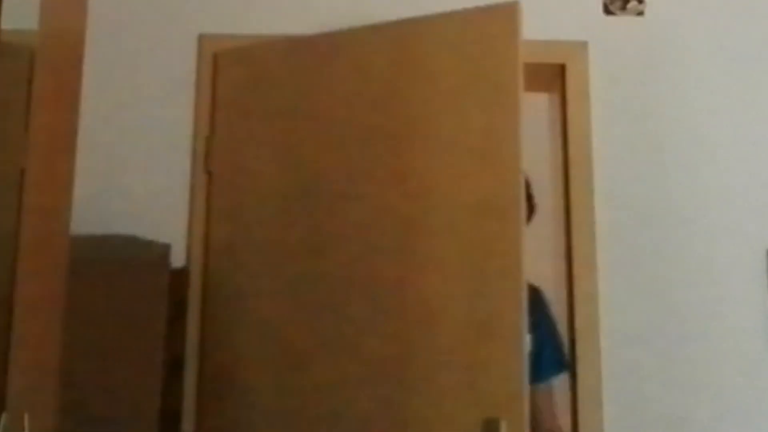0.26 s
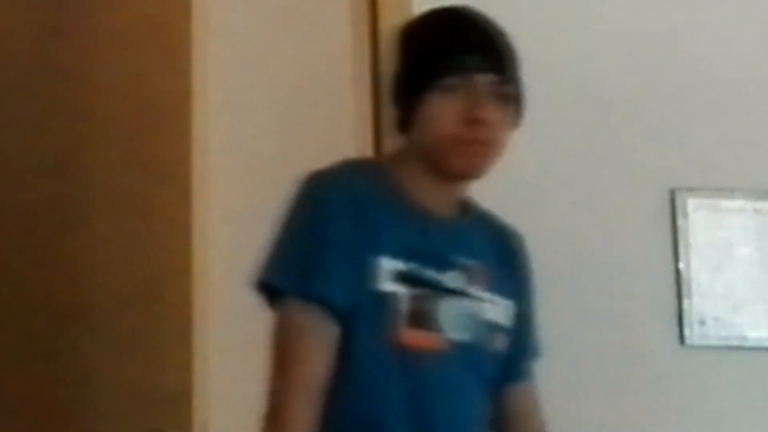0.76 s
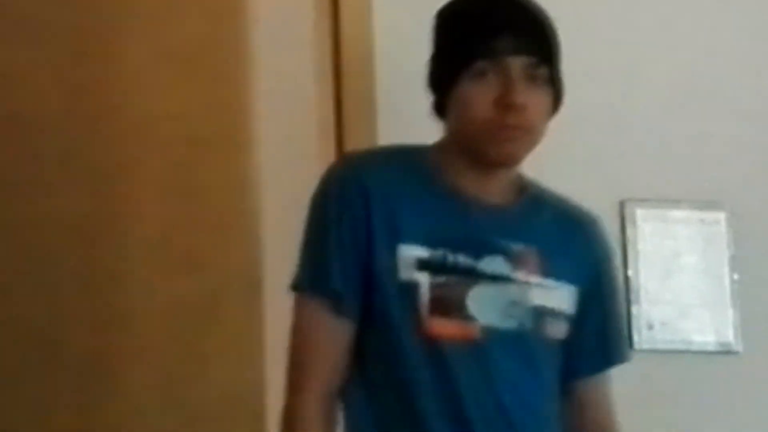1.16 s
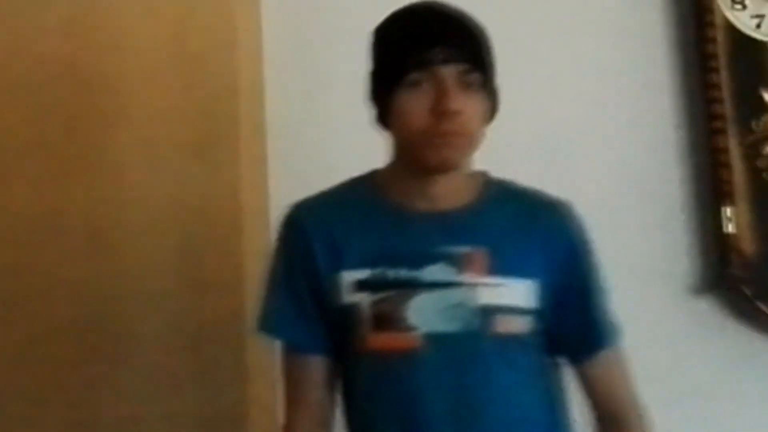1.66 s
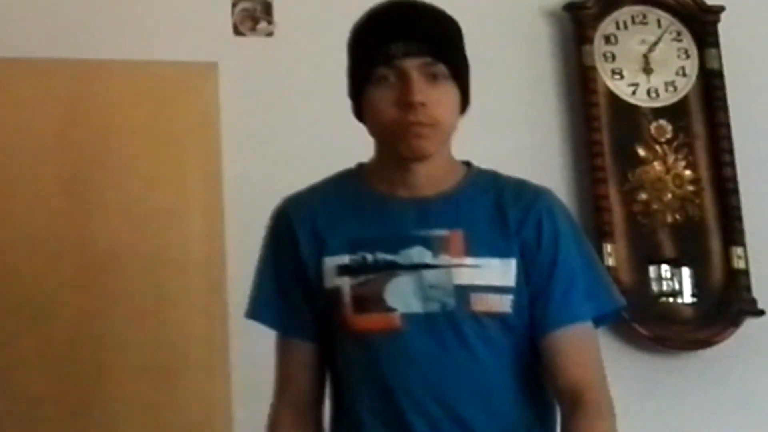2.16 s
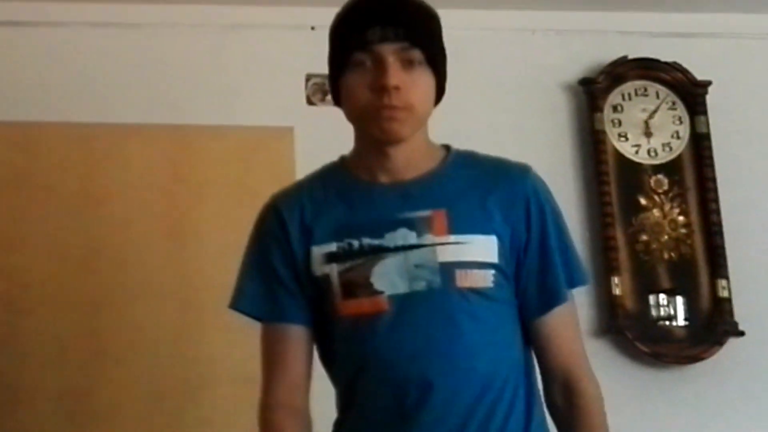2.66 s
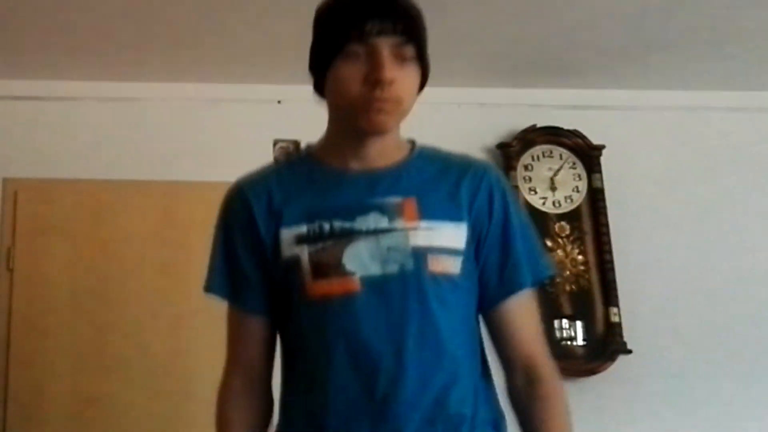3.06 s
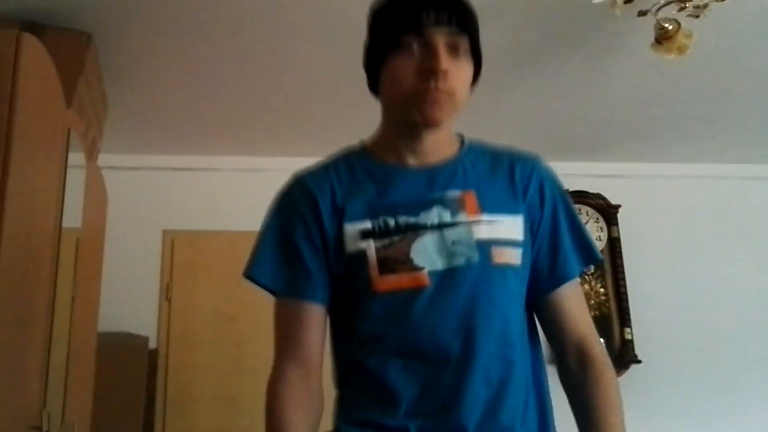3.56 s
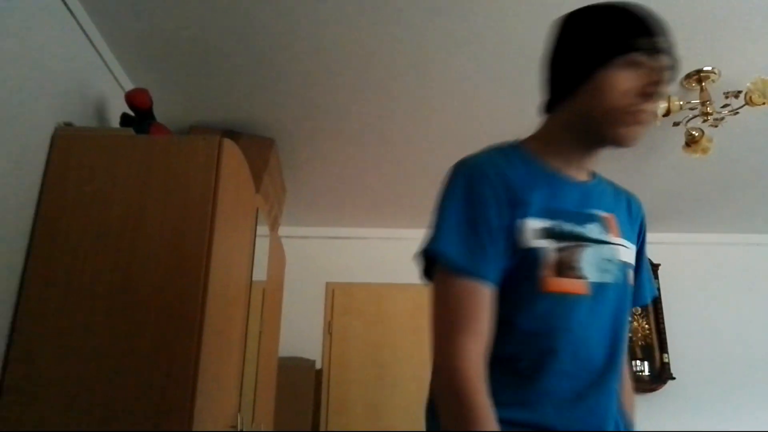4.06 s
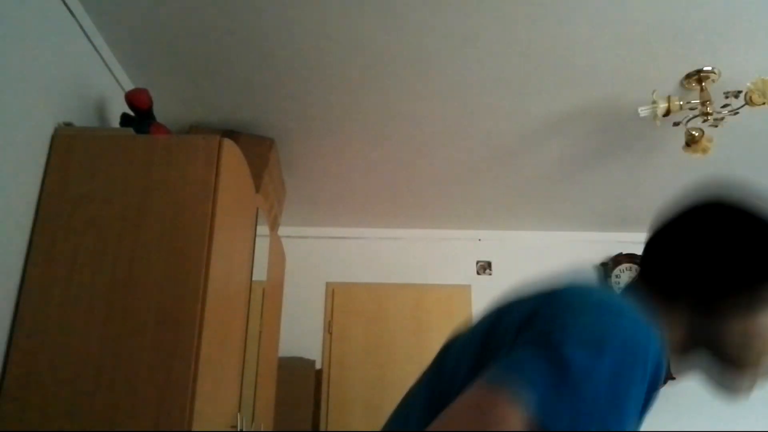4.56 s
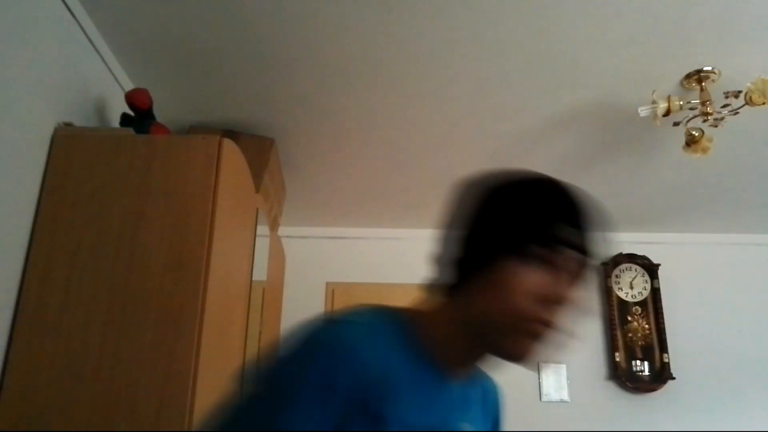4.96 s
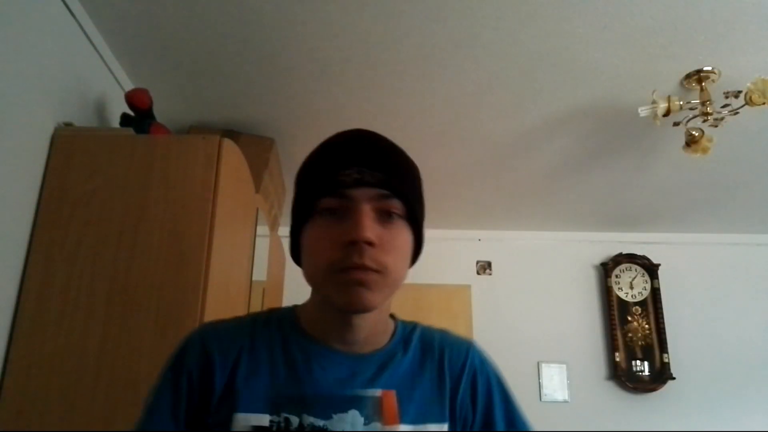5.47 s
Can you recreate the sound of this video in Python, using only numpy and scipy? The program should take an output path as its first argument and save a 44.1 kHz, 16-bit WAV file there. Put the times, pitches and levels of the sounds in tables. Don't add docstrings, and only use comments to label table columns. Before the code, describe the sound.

In a hissy small room a door bangs shut at two seconds, its frame shaking; steps, knocks and a faint clock tick surround it.

```python
import sys
import numpy as np
from scipy import signal
from scipy.fft import rfft, irfft
from scipy.io import wavfile
from scipy.ndimage import uniform_filter1d

SR = 44100
rng = np.random.default_rng(int(sys.argv[2]) if len(sys.argv) > 2 else 0)


def wrap_up_sound(samples):
    columns = np.atleast_2d(samples).T
    tamed = np.clip(columns, -1, 1)
    steps = np.round(tamed * 32767).astype(np.int16)
    wavfile.write(sys.argv[1], SR, steps)


def ratio(d):
    e = np.asarray(d, float) / 20
    return 10 ** e


N = 252526


def evened(x):
    return x / np.sqrt(np.mean(x ** 2) + 1e-20)


def steady(x):
    return evened(x / np.sqrt(uniform_filter1d(x ** 2, size=3000) + 1e-12))


def read(points, hz):
    f, value = np.transpose(points)
    return np.interp(np.log(hz + 1), np.log(f + 1), value)


def add(mix, s, sound):
    part = mix[..., round(s * SR):][..., :sound.shape[-1]]
    part += sound[..., :part.shape[-1]]


def band(x, lo_hz, hi_hz):
    return signal.sosfilt(signal.butter(2, [lo_hz, hi_hz], "band", fs=SR, output="sos"), x)


def colour(x, db_points):
    hz = np.fft.rfftfreq(x.shape[-1], 1 / SR)
    return irfft(rfft(x) * ratio(read(db_points, hz)), x.shape[-1])


def ring(modes, seconds):
    t = np.arange(round(seconds * SR)) / SR
    return sum(ratio(db - 60 * t / t60) * np.sin(2 * np.pi * hz * t) for hz, db, t60 in modes)


def contact(length, rise=0.0009, grit_db=11.5):
    t = np.arange(round(.25 * SR)) / SR
    grit = evened(uniform_filter1d(rng.standard_normal(len(t)), size=60))
    return (1 - np.exp(-t / rise)) * np.exp(-t / max(length, .002)) * ratio(grit_db * grit)


def swells(s, db, rise_db_s, fall_db_s, rest_db):
    coarse = np.arange(0, N + 64, 64)
    t = coarse[:, None] / SR - s
    level = ratio(db + np.where(t < 0, rise_db_s * t, -fall_db_s * t))
    power = (level ** 2).sum(1) + ratio(rest_db) ** 2
    return np.interp(np.arange(N), coarse, np.sqrt(power))


def pair(a, b, same, lean):
    hz = np.fft.rfftfreq(len(a), 1 / SR)
    likeness = np.clip(read(same, hz), -1, 1)
    tilt = ratio(read(lean, hz) / 2)
    left, other = rfft(a), rfft(b)
    right = likeness * left + np.sqrt(1 - likeness ** 2) * other
    return irfft(np.array([left * tilt, right / tilt]), len(a))


def both_ports(x, left_db):
    return x * ratio(np.array([[left_db], [-left_db]]))


def hiss():
    # (frequency [Hz], level [dB per Hz])
    spectrum = [(35, -46), (60, -9.5), (295, -7), (399, -8), (480, -10.5), (526, -5.5), (798, -9),
                (937, -6), (1030, -7.5), (1420, -16), (3260, -18.5), (13700, -26), (15000, -22)]
    # (frequency [Hz], likeness [-1..1])
    port_same = [(60, -0.015), (180, 0.87), (540, 0.46), (1620, -0.22), (4850, -0.12), (14500, 0.092)]
    # (frequency [Hz], left over right [dB])
    port_lean = [(60, 0.67), (240, 2.2), (930, 3), (3690, 1.3), (14500, 0.28)]
    a, b = (colour(rng.standard_normal(N), spectrum) for _ in range(2))
    drift = evened(uniform_filter1d(rng.standard_normal(N), size=5000))
    return ratio(-64.5 + .5 * drift) * evened(pair(a, b, port_same, port_lean))


def ping(db, hz, rise, t60):
    sound = ring([(hz, 0, t60), (hz * 1.07, -5, t60 * .8)], .3)
    rough = 1 + 0.66 * evened(uniform_filter1d(rng.standard_normal(len(sound)), size=200))
    t = np.arange(len(sound)) / SR
    return ratio(db) * sound * rough * (1 - np.exp(-t / max(rise, .0005)))


def pings():
    # (time [s], level [dB], pitch [Hz], rise [s], t60 [s])
    hollow_parts = [(.005, -60.5, 293, 0.011, 0.24), (0.3527, -47, 1076, 0.001, 0.027),
                    (.829, -51.5, 929, 0.002, 0.077), (2.106, -30.5, 1202, 0.002, 0.054),
                    (2.112, -32, 911, 0.0034, 0.13), (2.134, -34, 595, 0.0033, 0.094),
                    (2.16, -28, 373, 0.0035, 0.079), (2.384, -47, 529, .015, 0.17),
                    (3.813, -32, 317, 0.0019, 0.052), (4.38, -34, 510, 0.0013, 0.042),
                    (4.655, -45, 686, 0.003, 0.068), (4.95, -67, 1990, .01, 0.08),
                    (5.0665, -46.5, 1055, 0.0025, 0.042), (5.32, -70, 2200, 0.018, 0.47),
                    (8.1, -67, 1900, 0.007, 0.25)]
    out = np.zeros(N)
    for s, *row in hollow_parts:
        add(out, s, ping(*row))
    return out


def footfall_boom():
    # (time [s], boom near 40 Hz [dB], hum [dB])
    landings = [(.02, -65, -56.5), (.1, -80, -60), (0.501, -55, -43.5), (.57, -53, -49), (.92, -66, -64),
                (1.09, -65.5, -88), (1.25, -80, -70), (1.71, -55.5, -59.5), (2.11, -48, -71),
                (2.42, -47, -47), (2.53, -44, -55), (2.69, -52.5, -61), (2.88, -54, -76), (3.2, -62, -79),
                (3.42, -64, -68), (3.53, -71.5, -60), (3.86, -53, -52), (3.92, -60, -57),
                (4.16, -64, -64.5), (4.39, -50, -54), (4.47, -56, -55), (4.62, -53, -48.5),
                (4.79, -54.5, -63), (5.06, -67, -70), (5.181, -58, -61.5), (5.37, -85, -63.5),
                (5.42, -73, -56), (5.47, -63, -59.5), (5.7, -78, -64)]
    s, boom_db, hum_db = np.transpose(landings)
    noise = rng.standard_normal((2, N))
    boom = steady(band(noise[0], 32.0, 52.2))
    boom = boom * swells(s, boom_db, rise_db_s=252, fall_db_s=94, rest_db=-75)
    wander = 0.82 * evened(uniform_filter1d(uniform_filter1d(noise[1], size=900), size=900))
    hum_hz = 129.5
    hum = np.sqrt(2) * np.sin(2 * np.pi * hum_hz * np.arange(N) / SR + wander)
    hum = hum * swells(s, hum_db, rise_db_s=520, fall_db_s=142, rest_db=-79)
    return both_ports(boom + hum, .8)


def knock(db, hz, thud_db, crack_db, length, touch, bright_db=0.0):
    noise = rng.standard_normal((3, round(.25 * SR)))
    drive = 0.12 * noise[0] * contact(length, rise=length * 0.28, grit_db=3.0)
    drive[60] += touch
    modes = [(hz, 0, 11 / hz), (hz * 1.043, -5, 9 / hz), (hz * 2.01, -12, 9 / hz),
             (hz * 3.2, -17, 11 / hz), (hz * 1.4, -6, 7 / hz)]
    body = signal.fftconvolve(drive, ring(modes, .1))[:len(drive)]
    thud = evened(band(noise[1], 94, 300)) * contact(length * 3.08, 0.013, 1)
    grain = band(noise[2], 780, 3280)
    grain = grain + ratio(bright_db) * 0.16 * band(noise[2], 3420, 5670)
    grain = grain + 0.067 * band(noise[2], 7900, 14000)
    crack = evened(grain) * contact(length * 1.75, rise=length * 0.15 / touch, grit_db=2.5)
    blow = ratio(db - 2.5) * body / abs(body).max()
    return blow + ratio(db - 6.0) * (ratio(thud_db) * thud + ratio(crack_db) * crack)


def steps():
    # (time [s], blow [dB], body pitch [Hz], crack re blow [dB])
    step_blows = [(0.25, -58.5, 940, -17), (0.369, -48, 420, -6), (0.479, -41, 257, -8),
                  (0.496, -39, 225, -21), (0.9, -59, 496, -17), (1.228, -53, 1090, -1.5),
                  (1.25, -59, 1120, -29), (1.688, -51.5, 830, 0), (2.699, -46.5, 620, -11),
                  (2.864, -50, 935, -8), (3.527, -47.5, 935, -4), (4.34, -53, 190, -4),
                  (4.419, -36.5, 300, -6.5), (4.449, -54.5, 543, -0.5), (4.515, -46, 278, 0),
                  (4.596, -41.5, 257, -27), (4.752, -47, 334, -23), (4.817, -46, 290, -19),
                  (5.048, -46, 520, -30), (5.474, -43, 980, -19), (5.497, -43, 940, -24)]
    out = np.zeros(N)
    for s, db, hz, crack_db in step_blows:
        add(out, s, knock(db, hz, -4.5, crack_db, length=.011, touch=0.72))
    return out


def rubs():
    # (peak time [s], rub [dB], swell [s], fade [s], top re rub [dB])
    slides = [(.252, -57.5, 0.028, 0.085, -0.5), (.354, -62.5, 0.086, 0.16, -21),
              (.924, -65, 0.066, 0.13, 6.5), (.998, -60.5, 0.34, .09, -17), (1.232, -63.5, 0.11, 0.062, -8),
              (1.598, -56.5, 0.053, 0.063, -13), (1.742, -60.5, 0.27, 0.13, -7.5),
              (2.706, -54.5, .02, 0.24, -18), (2.962, -64, 0.084, 0.1, -5), (3.328, -64, .04, 0.45, -16),
              (3.534, -59.5, .06, 0.089, -16), (3.931, -60.5, 0.079, 0.32, -10),
              (4.155, -72, 0.021, 0.054, 1), (4.47, -56, 0.13, 0.052, -7), (4.658, -58, 0.15, 0.12, -7),
              (4.954, -63, 0.88, 0.49, -5.5), (5.502, -60.5, 0.17, 0.23, -7.5),
              (5.68, -64.5, 0.28, .2, -6.5)]
    s, rub_db, swell, fade, top_db = np.transpose(slides)
    span_db = 18.5
    rates = span_db / np.maximum(swell, .005), span_db / np.maximum(fade, .005)
    grit = rng.standard_normal((N, 2)).T * ratio(2.36 * np.minimum(rng.exponential(1, N), 5))
    low, top = evened(band(grit[0], 590, 5630)), evened(band(grit[1], 4300, 21800))
    low = low * swells(s, rub_db, *rates, rest_db=-86)
    top = top * swells(s, rub_db + top_db, *rates, rest_db=-82.5)
    return ratio(-4.5) * (low + top)


def knocks():
    # (time [s], blow [dB], body pitch [Hz], crack re blow [dB], brightness [dB])
    light_blows = [(0.344, -59, 242, 3, 0), (0.351, -39.5, 1090, -7, -8), (0.825, -48.5, 790, -7, -9),
                   (0.838, -51, 1010, -21, -9), (3.379, -45.5, 345, -21, 0), (3.796, -36.5, 290, -7.5, -6),
                   (3.805, -28, 285, -4, -6), (3.815, -31, 385, -8.5, 6), (3.821, -33, 267, -26, -5),
                   (3.858, -37.5, 353, -8, 8), (4.374, -29.5, 576, -6.5, -3), (4.382, -32, 520, -3, 48),
                   (4.386, -35.5, 486, -18, 2), (4.63, -40, 266, -18, 18), (4.655, -37.5, 297, -26, 0),
                   (4.688, -40.5, 281, -31, 4), (5.076, -47, 890, -32, -5), (5.112, -43, 800, -29, -5),
                   (5.162, -49, 242, -15.5, 13.5), (5.52, -44.5, 980, -12, 0), (5.558, -41.5, 360, -26, 0),
                   (5.6, -50, 333, -28, 0), (5.69, -51, 420.4, -20, 0)]
    out = np.zeros(N)
    for s, db, hz, crack_db, bright_db in light_blows:
        add(out, s, knock(db, hz, -19, crack_db, length=0.011, touch=0.97, bright_db=bright_db))
    return out


def clock():
    # (time [s], level [dB])
    ticks = [(1.041, -48), (1.571, -46), (2.632, -46), (3.163, -47), (3.694, -46), (4.225, -47),
             (4.757, -47), (5.287, -46)]
    # (frequency [Hz], level [dB], t60 [s])
    case_modes = [(900, -3, .003), (1500, -3, .003), (1950, -6, .004), (4200, -12, .004), (6800, -17, .003)]
    out = np.zeros((2, N))
    for s, db in ticks:
        add(out, s, both_ports(-ratio(db) * ring(case_modes, .006), 1.5))
    return out


def puff():
    # (time [s], level [dB], length [s])
    air_push = (2.038, -39, .05)
    s, db, length = air_push
    out = np.zeros(N)
    add(out, s, ratio(db) * np.hanning(round(length * SR)))
    return both_ports(out, .8)


def latch():
    # (time [s], level [dB], contact length [s])
    scrapes = [
        (2.104, -27.5, 0.01),
        (2.109, -27.5, 0.0072),
        (2.133, -24.5, 0.017),
        (2.172, -41, 0.011),
        (2.208, -48, 0.059),
        (2.385, -65.5, 0.081),
    ]
    # (time [s], level [dB])
    snaps = [
        (2.109, -21),
        (2.119, -39),
        (2.139, -43),
    ]
    # (frequency [Hz], level [dB], t60 [s])
    metal_modes = [(3612, 0, .025), (4312, -10, .02), (4802, -6, .03), (5712, -8, .03), (6230, -9, .03),
                   (7887, -8, .02)]
    # (frequency [Hz], level [dB per Hz])
    rattle = [(120, -27), (250, 2.5), (600, -4), (1100, -5), (2400, -7), (3300, -7.5), (5500, -5.5),
              (8000, -12.5), (10300, -22.5), (13700, -18), (15000, -59)]
    drive, metal = np.zeros(N), np.zeros(N)
    for s, db, length in scrapes:
        add(drive, s, ratio(db) * contact(length, grit_db=2.0))
    for s, db in snaps:
        struck = [(hz * rng.uniform(1.0, 1.01), d, t60) for hz, d, t60 in metal_modes]
        add(metal, s, ratio(db) * ring(struck, .08))
    return evened(colour(rng.standard_normal(N), rattle)) * drive + metal


def leaf():
    # (time [s], blow [dB], contact length [s])
    blows = [
        (2.132, -14.5, 0.016),
        (2.181, -24.5, 0.015),
        (2.207, -20.5, 0.03),
        (2.299, -23, 0.096),
        (2.37, -35.5, 0.014),
        (2.43, -44, 0.011),
    ]
    # (frequency [Hz], level [dB], t60 [s])
    leaf_modes = [(38, 10, 0.68), (47, 3.5, 0.25), (69.2, 0.5, 0.22), (78, -33, 0.2), (133.8, -7, 0.33),
                  (183.4, -6.5, 0.25), (257.6, -7, 0.15), (335, -4, 0.11), (370, -16, 0.053),
                  (494, -12.5, 0.17), (613, -7, .08), (798, 2, 0.058), (905, -4, 0.067), (1140, -26, .05)]
    out = np.zeros(N)
    t = np.arange(round(.03 * SR)) / SR
    for s, db, length in blows:
        push = np.exp(-t / (length * 0.04)) * (1 + 1.85 * rng.standard_normal(len(t)))
        add(out, s, ratio(db - 7.0) * signal.fftconvolve(push / push.sum(), ring(leaf_modes, 0.77)))
    lows = signal.sosfilt(signal.butter(2, 215, fs=SR, output="sos"), out)
    return both_ports(lows, .7), out - lows


def shudder():
    # (time [s], level [dB], length [s])
    shakes = [
        (2.135, -23.5, 0.042),
        (2.184, -28.5, 0.031),
        (2.361, -43.5, 0.066),
    ]
    out = np.zeros(N)
    for s, db, length in shakes:
        shake = evened(band(band(rng.standard_normal(round(.25 * SR)), 91, 249), 97, 350))
        add(out, s, ratio(db) * shake * contact(length, rise=0.011, grit_db=3.5))
    return out


def direct(x, lag, lean_db):
    return np.array([np.roll(x, lag) * ratio(lean_db), x * ratio(-lean_db)])


def room(x):
    # (frequency [Hz], t60 [s])
    decay = [(150, 0.38), (400, 0.46), (1040, 0.4), (2760, 0.36), (7280, 0.2)]
    # (frequency [Hz], likeness [-1..1])
    tail_same = [(60, .995), (160, .97), (280, .87), (500, .62), (1000, .0), (4000, .05)]
    # (frequency [Hz], left over right [dB])
    tail_lean = [(60, 2), (180, -1.5), (540, 4.5), (1620, 6.5), (4850, -0.5), (14500, -10)]
    out, turn = np.zeros((2, N)), np.arange(N) / SR * 1.725
    for k in range(3):
        taps = rng.standard_normal((2, 30000)) * (np.arange(30000) > 200)
        hz, t, z = signal.stft(taps, SR, nperseg=256)
        t60 = read(decay, hz)[:, None]
        tail = signal.istft(z * ratio(-60 * t / t60) / np.sqrt(t60), SR, nperseg=256)[1]
        tail = pair(*tail, tail_same, tail_lean)
        fed = x * np.sqrt(2 / 3) * np.cos(np.pi * (turn + k / 3))
        out += signal.fftconvolve(fed[None], tail / np.linalg.norm(tail[0]), axes=1)[:, :N]
    return out


def scene():
    near = pings() + steps() + knocks()
    slides = rubs()
    lows, highs = leaf()
    door = latch() + highs + shudder()
    straight = ratio(-1.0) * direct(door + slides, 18, 1.0) + ratio(2.38) * direct(near, 4, 2.16)
    wet = room(ratio(0.5) * door + ratio(0.6) * slides + ratio(-2.0) * near)
    return straight + wet + lows + footfall_boom() + puff() + clock() + hiss()


def top_cut(x):
    return signal.sosfilt(signal.butter(12, 15140, fs=SR, output="sos"), x)


def record(dry):
    cut = signal.sosfilt(signal.butter(2, 24, "high", fs=SR, output="sos"), dry)
    dip_hz, dip_width_hz, dip_share = 3290, 260, .55
    dip = signal.iirpeak(dip_hz, dip_hz / dip_width_hz, SR)
    cut = cut - dip_share * signal.lfilter(*dip, cut)
    top_edge = signal.firwin(601, 14750, window=("kaiser", 9), fs=SR)
    mix = signal.oaconvolve(cut, top_edge[None], "same")
    return top_cut(mix)


dry = scene()
out = record(dry)
wrap_up_sound(out)
```